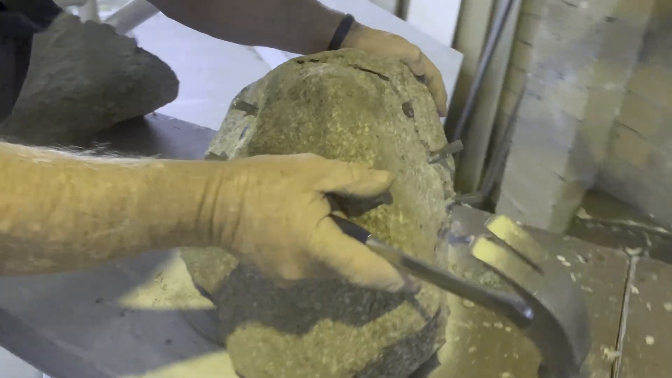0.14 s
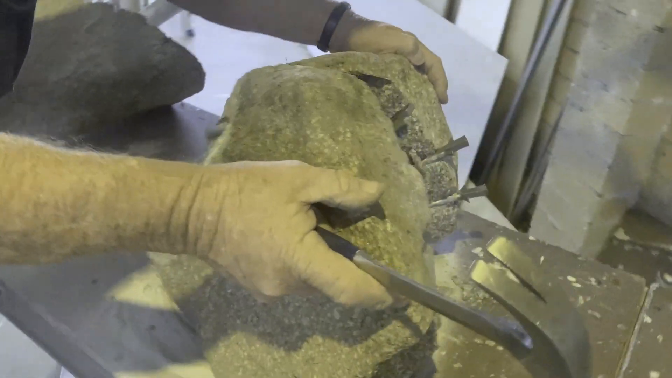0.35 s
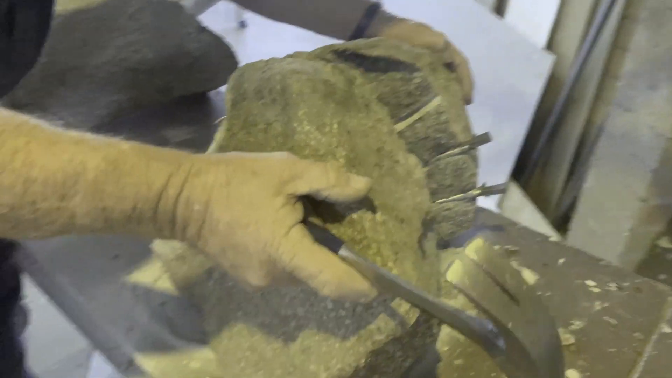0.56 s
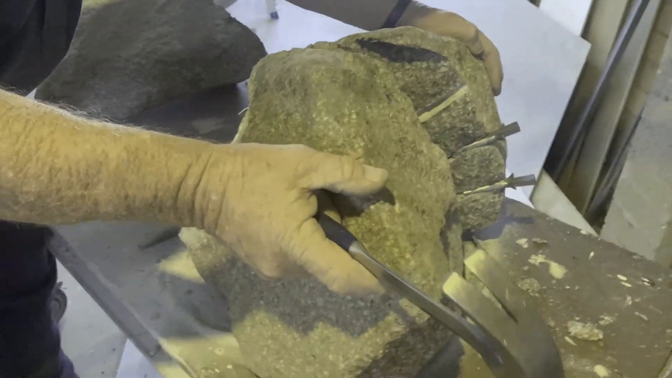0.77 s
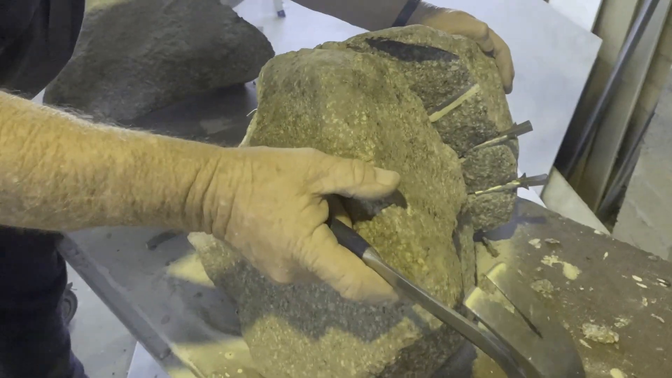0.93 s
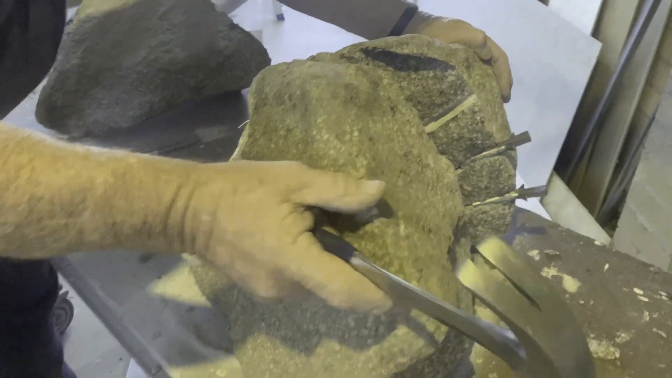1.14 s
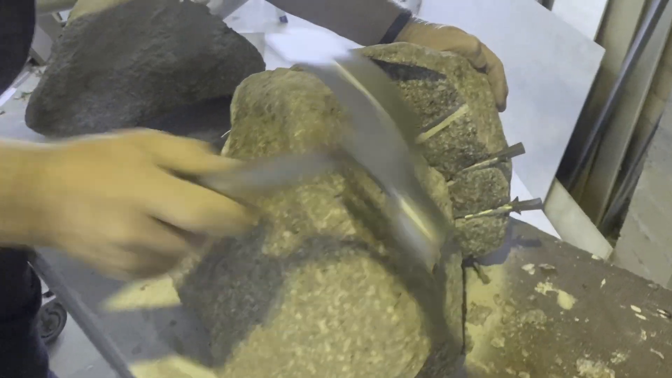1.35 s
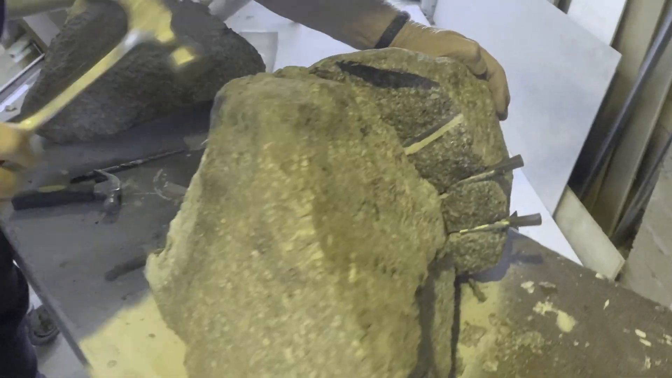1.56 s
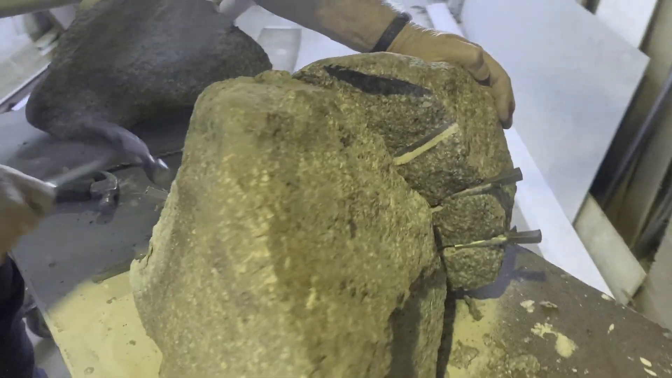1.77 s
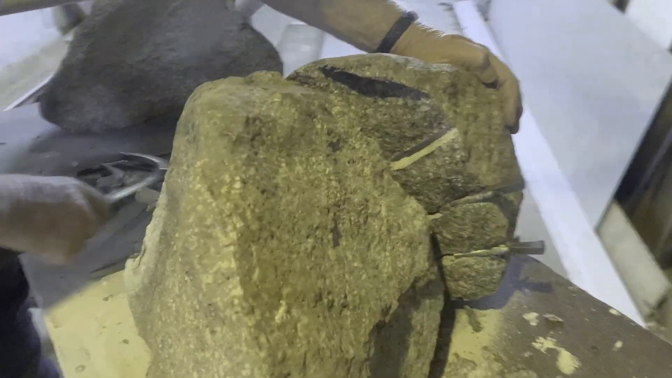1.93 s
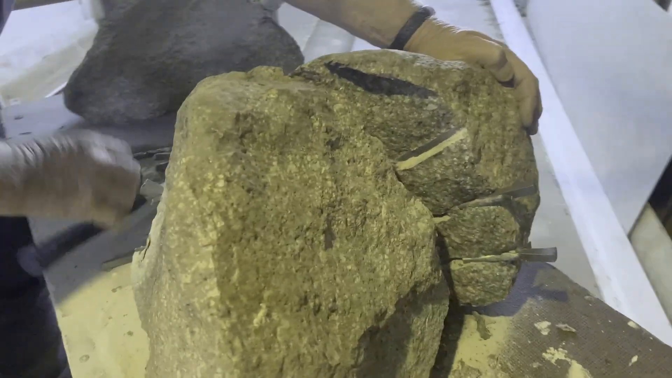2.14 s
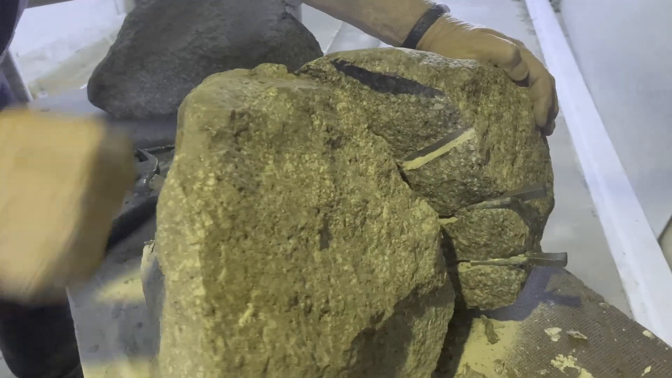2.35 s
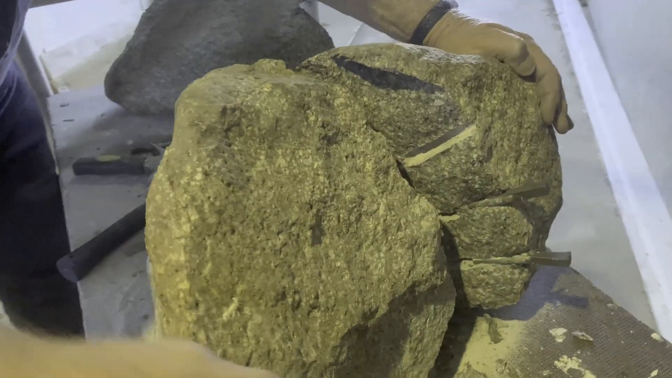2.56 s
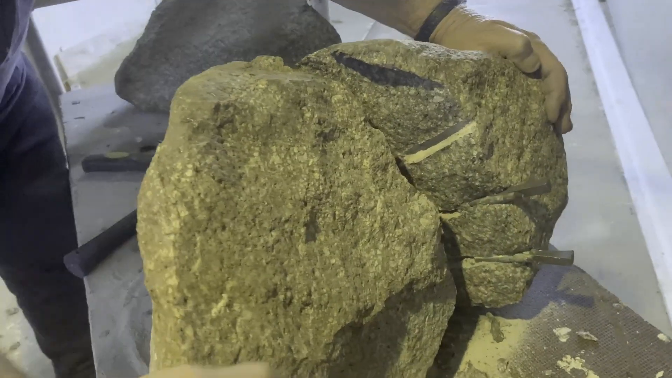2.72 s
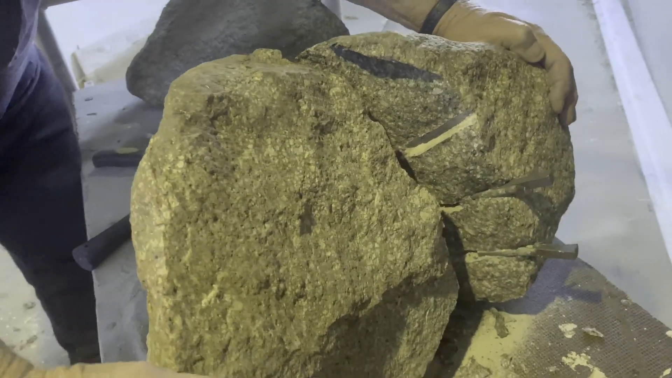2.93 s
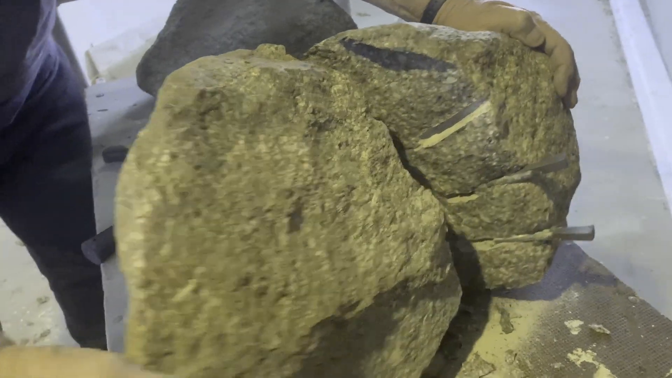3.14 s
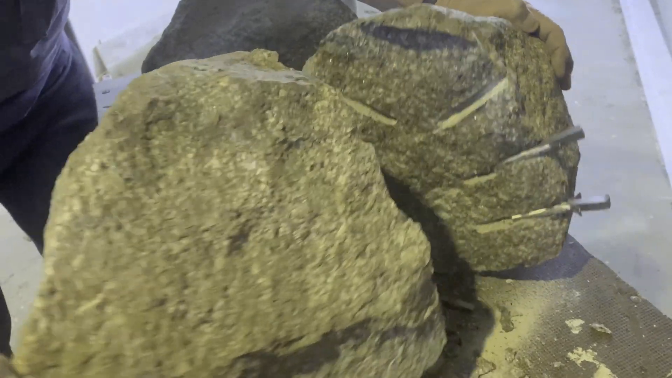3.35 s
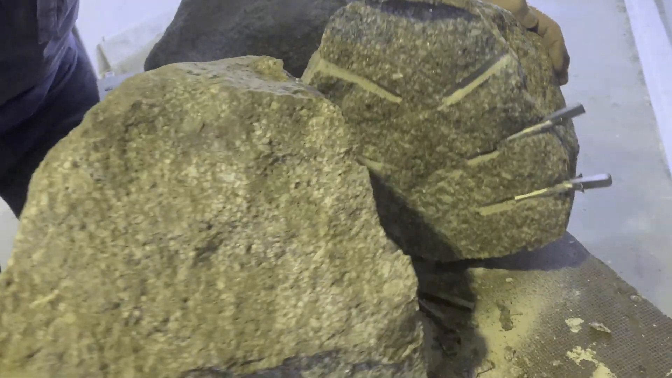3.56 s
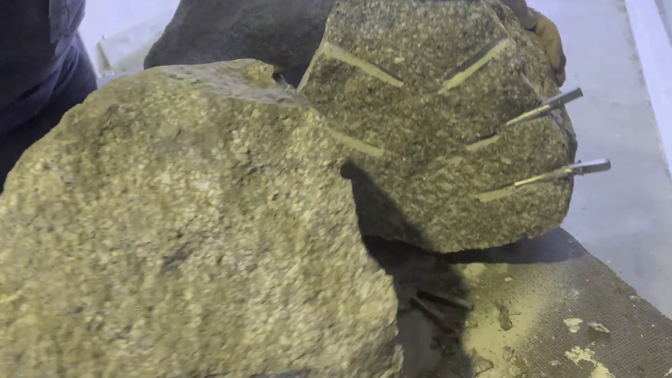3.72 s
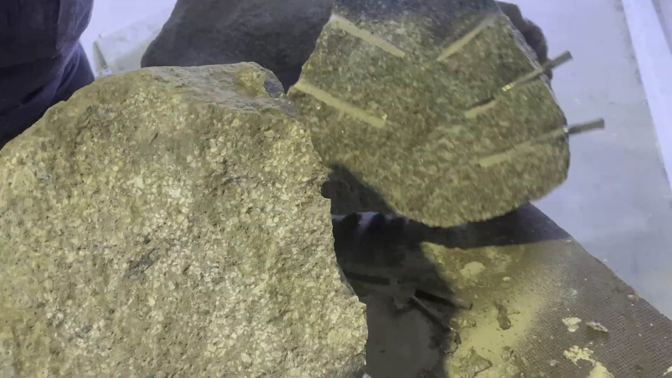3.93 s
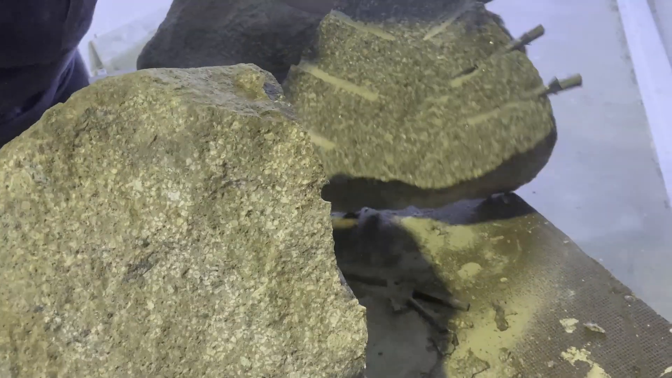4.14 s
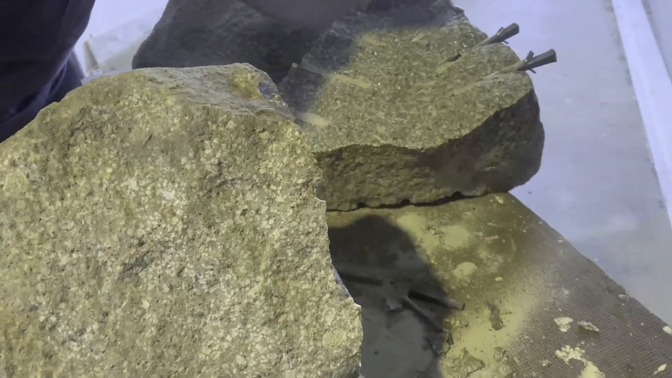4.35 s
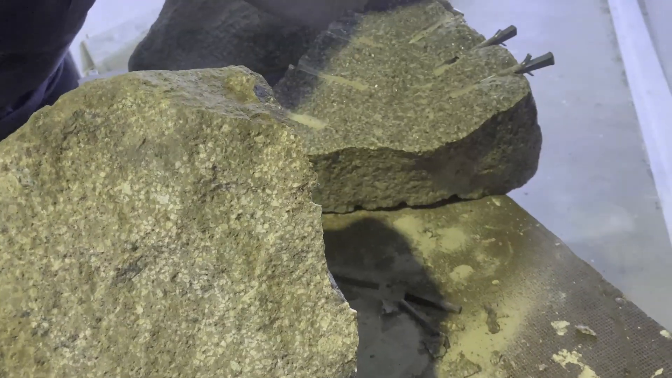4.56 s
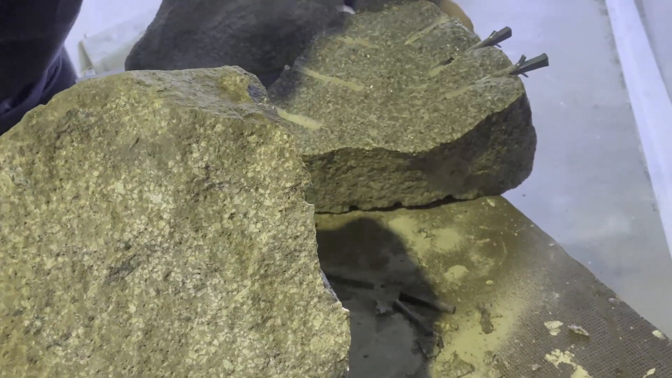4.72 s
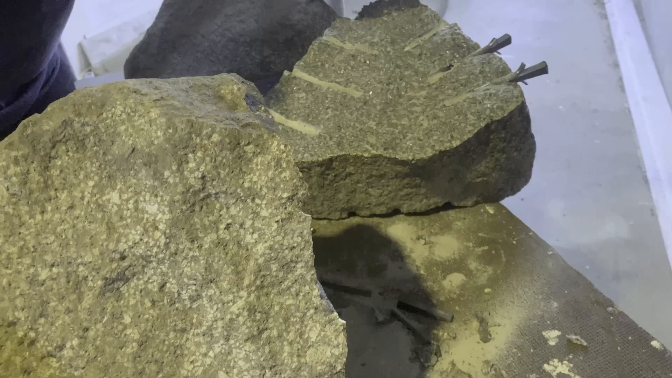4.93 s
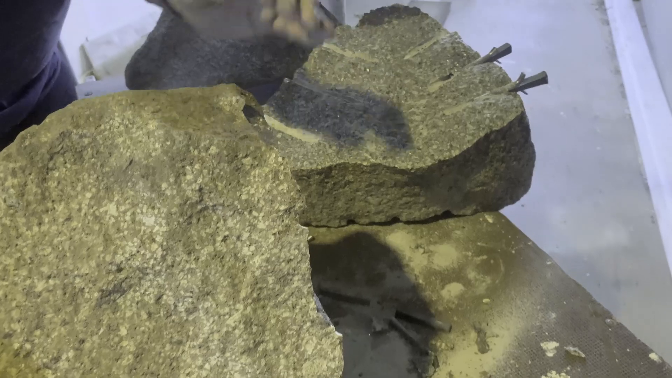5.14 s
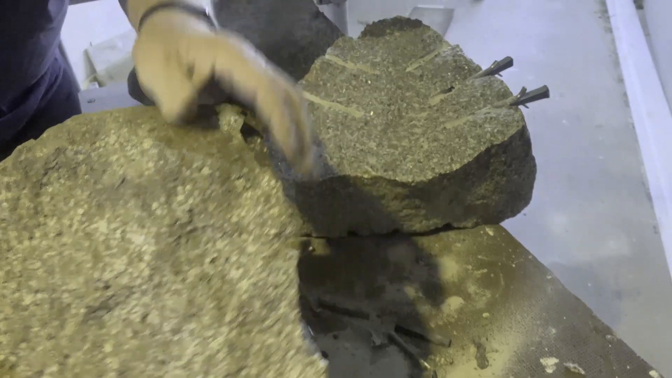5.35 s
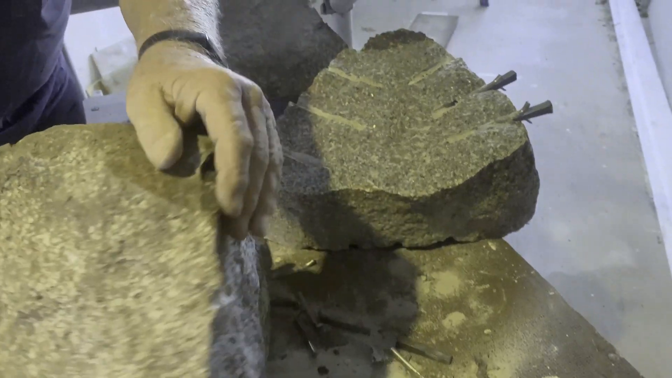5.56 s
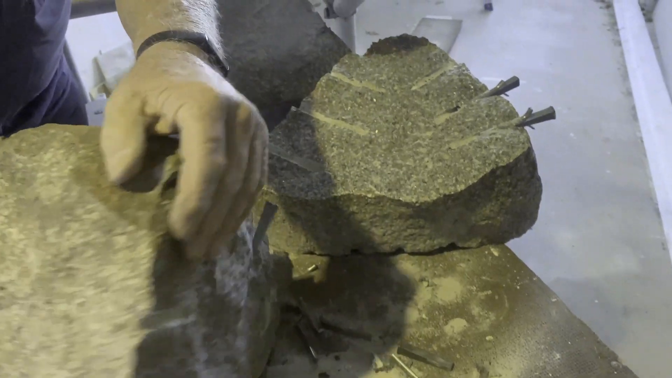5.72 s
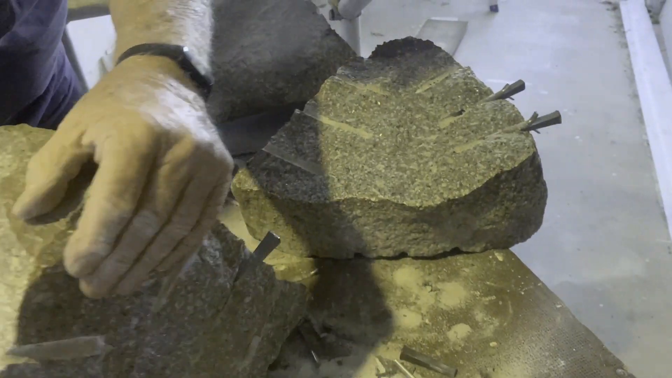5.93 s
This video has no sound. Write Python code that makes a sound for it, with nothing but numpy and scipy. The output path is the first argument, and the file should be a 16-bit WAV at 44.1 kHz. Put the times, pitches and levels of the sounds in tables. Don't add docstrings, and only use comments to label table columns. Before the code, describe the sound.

Close, gritty stone scraping and hard hollow knocks come in bursts, with snapping grains and low bench thuds in a small dull workshop.

```python
import sys
import numpy as np
from scipy import signal
from scipy.fft import rfft, irfft, next_fast_len
from scipy.io import wavfile
from scipy.ndimage import uniform_filter1d

SR = 44100
rng = np.random.default_rng(int(sys.argv[2]) if len(sys.argv) > 2 else 0)


def persist_wave(psi):
    counts = np.round(np.clip(psi, -1, 1) * 32767).astype(np.int16)
    wavfile.write(sys.argv[1], SR, np.atleast_2d(counts).T)


def linear_from_db(decibels):
    return 10 ** (np.asarray(decibels, float) / 20)


N = 268569
T = np.arange(N) / SR


def band(x, lo_hz, hi_hz, order=2):
    return signal.sosfilt(signal.butter(order, [lo_hz, min(hi_hz, .45 * SR)], "band", fs=SR, output="sos"), x)


def unit(x):
    return x / np.sqrt(np.mean(x ** 2))


def ring(x, hz, width_hz):
    return signal.lfilter(*signal.iirpeak(hz, hz / width_hz, SR), x)


def add(out, s, x):
    i = int(s * SR)
    out[:, i:i + x.shape[1]] += x[:, :N - i]


def slips(rate_hz, scatter_db, slip_s, bed):
    caught = rng.random(N) < rate_hz / SR
    kicks = caught * linear_from_db(scatter_db * np.minimum(rng.exponential(size=N), 2))
    force = signal.lfilter([1], [1, -np.exp(-1 / (slip_s * SR))], kicks)
    return (bed + unit(force)) * rng.standard_normal((2, N))


def burst(t, t60_s, sharp_s, swell):
    t60_s = np.clip(t60_s, .015, .5)
    return linear_from_db(-60 * t / t60_s) * (1 - np.exp(-t / (sharp_s + swell * t60_s ** 2)))


def tones(notes):
    out, quarter = np.zeros((2, N)), np.array([[0], [np.pi / 2]])
    for s, db, hz, t60_s, rise_s in notes:
        t = T[:int(max(t60_s, .01) * SR)]
        envelope = linear_from_db(db - 60 * t / t60_s) * (1 - np.exp(-t / rise_s))
        add(out, s, envelope * np.sin(2 * np.pi * hz * t + quarter))
    return out


def drag():
    # t/s, weight on the contact/dB, slide speed as grit over grind/dB
    prise = [(0.0, -77, -5), (0.184, -63, 13), (0.38, -43.5, 2), (0.522, -40.5, -15), (0.952, -52, -18),
             (1.044, -58, -16), (1.3, -74.5, 3), (1.66, -85, -2), (1.955, -89.5, 0.5)]
    lay = [(1.965, -45.5, -19), (2.167, -55, -10.5), (2.337, -44, -31.5), (2.643, -72.5, -2.5),
           (2.9, -85, 15)]
    pull = [(2.91, -77, 9), (3.034, -60.5, -4.5), (3.16, -48.5, 5), (3.246, -48.5, 5), (3.755, -57.5, -10)]
    tip = [(3.765, -47, -2), (3.999, -46.5, -14), (4.205, -53, -11.5), (4.36, -63, -8)]
    settle = [(4.368, -46, -12.5), (4.548, -47, -27), (4.728, -64.5, -14), (5.056, -72, -11),
              (5.235, -77.5, -10)]
    turn = [(5.243, -75, 14.5), (5.333, -53, -1), (5.487, -51.5, 3), (5.749, -48.5, 0.5),
            (6.09, -55.5, -22.5)]
    moves = [(prise, 2.3), (lay, -4), (pull, 3.6), (tip, -1.6), (settle, 1.9), (turn, 5.2)]
    s, weight_db, speed_db, bare_db = np.array([(*row, db) for move, db in moves for row in move]).T
    grind_db, speed_db, bare_db = (np.interp(T, s, c) for c in (weight_db, speed_db, bare_db))
    scrape_db = grind_db + bare_db + 0.36 * speed_db
    grit_db = grind_db + speed_db
    grind = band(slips(96, 1.6, 0.0066, 0.42), 210, 590)
    scrape = band(slips(190, 1.5, 0.0046, 0.45), 640, 2400, order=1)
    scrape = band(scrape, 230, 3500, order=1)
    grit = band(slips(280, 2.0, 0.001, 1.0), 3500, 19000, order=1)
    return linear_from_db(grind_db - 0.5) * unit(grind) + linear_from_db(scrape_db) * unit(scrape) + linear_from_db(grit_db - 1.5) * unit(grit)


def rasp():
    # t/s, level/dB
    grating = [(3.2, -110), (3.33, -60.5), (3.55, -55.5), (3.7, -58.5), (3.75, -89), (3.8, -52.5),
               (3.9, -73), (4.2, -110), (4.53, -77), (4.59, -58.5), (4.67, -74.5), (4.95, -110),
               (5.25, -88), (5.42, -55), (5.65, -53.5), (5.8, -54.5), (5.95, -47), (6.03, -71.5)]
    shear = band(slips(600, 2.0, 0.002, 0.8), 900, 4600, order=1)
    return linear_from_db(np.interp(T, *np.transpose(grating))) * unit(shear)


def knocks():
    # t/s, peak/dB, t60/s, crunch/dB
    board = [(1.988, -31, 0.33, 6.5), (2.109, -32, 0.049, 3), (2.358, -34.5, 0.33, 7.5),
             (2.433, -40, 0.3, 3), (3.305, -34, .1, -5), (3.509, -41, .1, 9), (3.769, -29.5, 0.13, -5.2),
             (3.92, -25, .08, -1), (4.39, -27.5, .4, -1)]
    foot = [(.522, -25, 0.071, -12), (1.973, -33, 0.13, 10.5), (2.05, -29, 0.38, 1), (2.07, -25, 0.1, -0.2),
            (2.384, -33, 0.093, 3), (2.472, -40.5, 0.071, 4.5), (4.379, -27, 0.025, 3.5),
            (4.434, -24.5, .044, -0.5)]
    block = [(.352, -19.5, 0.2, -19.5), (.49, -29.5, 0.07, 4.5), (.544, -25.5, 0.53, -3.5),
             (.557, -21, .07, 5), (.626, -23, 0.18, 2), (.655, -22.5, 0.083, 5), (.69, -35, 0.54, 5),
             (.944, -30.5, 0.059, 5.5), (.975, -38, 0.34, 0), (2.017, -21, .18, -1.5),
             (2.232, -28, 0.12, 8), (2.252, -28.5, 0.2, 3.5), (2.357, -33, 0.085, -0.5),
             (3.13, -31, .1, -10), (3.921, -28, 0.068, 10.5)]
    lip = [(2.417, -36.5, 0.26, -24), (3.939, -26, 0.078, 8.5), (5.243, -57.5, .14, 9.5),
           (5.33, -28, 0.35, 8.5), (5.36, -31.5, 0.099, 15.5), (5.473, -43, 0.4, 3),
           (5.701, -35, 0.019, 10)]
    face = [(.372, -29, 0.052, 11.5), (.445, -24, 0.047, 9), (2.918, -56, 0.023, 5),
            (2.979, -43.5, 0.16, -4.5), (3.041, -33, 0.034, -20), (3.069, -37, 0.028, -3),
            (3.104, -27, 0.1, 4), (3.165, -24.5, .05, 2), (3.222, -20.5, 0.033, -2),
            (3.29, -29, 0.043, 8.5), (3.638, -38, 0.028, 8.5), (3.885, -36.5, 0.36, 12),
            (3.905, -23.5, .08, 4), (4.038, -32, 0.026, -2), (3.842, -37, 0.19, 10),
            (4.366, -23.5, 0.084, -25), (5.844, -27, 0.2, 7), (5.867, -26.5, 0.061, 0.5),
            (5.913, -38, 0.29, 6)]
    edge = [(.424, -31.5, .1, 14), (1.235, -43, 0.049, 1), (3.117, -24, 0.09, 3.5),
            (3.187, -28.5, 0.033, 15), (3.202, -21.5, 0.14, 0.5), (3.248, -32.5, 0.079, 11.5),
            (3.439, -41, .03, 2), (3.467, -46, 0.71, 0), (4.112, -34.5, 0.028, 3), (4.16, -34.5, 0.05, 3),
            (4.57, -44, 0.49, 1), (4.855, -53.5, 0.18, 4.5), (4.173, -41, 0.36, -1)]
    chip = [(.049, -55, 0.087, 5.5), (.34, -28, 0.24, 12), (1.149, -50.5, 0.12, 5),
            (4.732, -51, 0.059, 7.5), (5.817, -22, 0.043, 0.5)]
    # t/s, peak/dB
    taps = [(1.394, -51.5), (1.57, -54.5), (1.625, -56), (1.729, -55.5), (1.759, -56), (2.684, -50),
            (2.868, -56.5), (5.086, -56), (5.113, -49)]
    tap_t60_s, tap_crunch_db = 0.027, -11.5
    tap_rows = [(s, db, tap_t60_s, tap_crunch_db) for s, db in taps]
    # part, ring f/Hz
    parts = [(board, 248), (foot, 410), (block, 552.5), (lip, 815),
             (face, 1010), (edge, 1460), (chip, 1800), (tap_rows, 580)]
    out, t = np.zeros((2, N)), T[:6000]
    for part_hz, s, db, t60_s, crunch_db in [(hz, *row) for rows, hz in parts for row in rows]:
        hz = part_hz * (1 + 0.033 * rng.standard_normal())
        crumble = rng.standard_normal((2, len(t))) * burst(t, t60_s, sharp_s=0.00055, swell=0.072)
        crumble += 0.62 * np.sin(np.pi * np.minimum(2 * hz * t, 1))
        tone = ring(ring(crumble, hz, 0.17 * hz), hz, 3.0 * hz)
        crunch = band(crumble, 0.43 * hz, 700 + 2.0 * hz, order=1)
        crunch = band(crunch, 230, 1500 + 1.29 * hz)
        add(out, s, linear_from_db(db - 5.0) * (tone / abs(tone).max() + linear_from_db(crunch_db) * crunch / abs(crunch).max()))
    return out


def cracks():
    # t/s, peak/dB
    snaps = [(.331, -28), (.507, -40), (.593, -51), (.038, -54), (.05, -49), (.097, -48), (.337, -17),
             (.442, -21), (.556, -32), (.943, -46), (1.232, -49), (1.294, -51), (1.971, -60), (2.017, -44),
             (2.117, -44), (2.178, -61), (2.599, -51), (2.915, -48), (3.038, -39.5), (3.252, -22.5),
             (3.288, -24.5), (3.377, -33), (4.112, -35.5), (4.162, -39), (4.242, -47), (4.734, -45),
             (4.86, -60), (4.942, -57), (5.251, -53.5), (5.283, -45), (5.702, -30), (5.74, -50),
             (5.818, -22.5)]
    sprays = [(.353, -21), (.42, -23.5), (.527, -46.5), (2.229, -46), (3.088, -46), (3.105, -21),
              (3.119, -22), (3.167, -22.5), (3.193, -21.5), (3.206, -19.5), (3.573, -36), (3.905, -27),
              (3.924, -21), (3.94, -27), (4.393, -46), (4.42, -45), (5.863, -25), (5.914, -25.5)]
    pours = [(.371, -34), (.624, -42.5), (.816, -44), (1.153, -56.5), (1.488, -63), (2.351, -60),
             (2.68, -63), (2.981, -48), (3.629, -39), (3.842, -31), (3.886, -27.5), (4.586, -63),
             (5.318, -34.5), (5.329, -30), (5.359, -23), (5.809, -29), (5.842, -24.5)]
    kinds = [(snaps, 0.028), (sprays, 0.1), (pours, 0.2)]
    out, t = np.zeros((2, N)), T[:5000]
    for t60_s, s, db in [(t60_s, *row) for rows, t60_s in kinds for row in rows]:
        tick = 0.53 * np.exp(-t / 0.0015)
        dust = rng.standard_normal((2, len(t))) * (burst(t, t60_s, sharp_s=0.00037, swell=0.15) + tick)
        dust = band(dust, 2700, 17000, order=1)
        add(out, s, linear_from_db(db + 1.0) * dust / abs(dust).max())
    return out


def bodies(x):
    # [(f/Hz, width/Hz, lift/dB)]
    moved = [
        (0, [(509, 160, -1), (984, 460, 4), (1500, 400, 3)]),
        (1.941, [(245, 60, 14), (411, 96, 6), (525, 110, 5.5), (1050, 500, 4)]),
        (2.899, [(240.5, 61, 10.5), (497, 21, 7.5), (1030, 61, 8), (1500, 80, 7), (2840, 43, 5), (3140, 190, 6.5)]),
        (3.7, [(278, 46, -0.5), (480, 92, -2), (960, 300, 6), (3000, 900, 3), (1460, 110, 4.5)]),
        (4.34, [(261, 55, 5), (780, 90, -1), (1500, 120, 6), (2050, 150, 8), (3700, 120, 6), (4500, 150, 6), (6000, 400, 7)]),
        (5.221, [(251, 29, 8), (696, 28, -30.5), (825, 70, 2), (1000, 36, 0.5), (1620, 64, 3), (2090, 110, 2.5), (3230, 490, 3.5)]),
    ]
    out = x.copy()
    ends = [s for s, _ in moved[1:]] + [N / SR]
    for (s, modes), end in zip(moved, ends):
        part = np.pad(x[:, int(s * SR):int(end * SR)], ((0, 0), (0, SR // 10)))
        add(out, s, sum((linear_from_db(db) - 1) * ring(part, hz, width_hz) for hz, width_hz, db in modes))
    return out * linear_from_db(-5.5)


def thicket(x, t60_s=0.065, dense_db=-7, size=6000):
    out, t = x.copy(), T[:5000]
    for i in range(0, N - size, size // 2):
        modes = band(rng.standard_normal((1, len(t))), 320, 6600, order=1) * linear_from_db(-60 * t / t60_s)
        modes *= linear_from_db(dense_db) / np.sqrt(np.sum(modes ** 2))
        add(out, i / SR, signal.fftconvolve(x[:, i:i + size] * np.hanning(size), modes, axes=1))
    return out


def rings():
    # t/s, peak/dB, f/Hz
    contacts = [(0.378, -33, 1740), (0.382, -29.5, 536), (0.41, -28.5, 470), (0.447, -25, 523),
                (0.487, -32, 367), (0.557, -20, 528), (0.656, -29, 1280), (0.676, -34, 1130),
                (0.689, -30, 425), (0.943, -33.5, 1196), (0.958, -39, 565), (0.977, -39, 585),
                (2.039, -24.5, 430), (2.232, -24.5, 295), (2.254, -23, 497), (2.308, -36, 830),
                (2.389, -28.5, 342), (2.414, -33, 382), (2.43, -32, 283), (2.466, -32, 256),
                (2.495, -36, 220), (3.106, -27, 1490), (3.118, -28.5, 526), (3.123, -25, 1990),
                (3.142, -28, 510), (3.165, -30.5, 586), (3.184, -28, 1505), (3.2, -30, 1010),
                (3.204, -32, 1510), (3.222, -26, 990), (3.245, -29, 1420), (3.287, -31, 990),
                (3.295, -28, 278), (3.309, -28.5, 976), (3.436, -37, 1000), (3.635, -37, 1090),
                (3.848, -36.5, 258), (3.858, -39, 390), (3.889, -32, 1270), (3.905, -32.5, 262),
                (3.91, -27.5, 765), (3.923, -25, 965), (3.931, -26, 890), (4.035, -39, 614),
                (4.382, -32.5, 463), (4.415, -34.5, 690), (5.337, -30, 802), (5.386, -33.5, 830),
                (5.478, -41, 860), (5.507, -40, 1130), (5.815, -34.5, 3100), (5.818, -37, 2400),
                (5.82, -39, 1060), (5.846, -33, 2100), (5.854, -29.5, 1130), (5.867, -31.5, 955),
                (5.869, -31, 1670), (5.924, -39, 272), (5.927, -39, 1180), (5.95, -39, 278),
                (.47, -31, 430), (.525, -31, 503), (.556, -35.5, 2900), (.583, -29, 500), (.627, -36, 1400),
              (.668, -33, 481), (.66, -38, 1904), (1.975, -30, 231), (2.02, -27, 229), (2.07, -30.5, 1100),
              (2.11, -30, 330), (2.36, -36, 1156), (2.365, -42, 1690), (3.017, -44.5, 984),
              (3.039, -37, 1037), (3.065, -38.5, 1030), (3.165, -27.5, 1030), (3.166, -31, 1500),
              (3.11, -28, 1030), (3.77, -39.5, 400), (4.4, -32.5, 230), (4.42, -34, 400), (4.46, -35, 300),
              (4.5, -38, 251), (4.86, -58, 1900), (4.98, -62, 2000), (3.438, -35, 1000), (4.165, -42, 1900),
              (.943, -36, 1900), (5.284, -44, 830), (5.7, -37, 1700), (5.846, -31.5, 1100)]
    floor_t60_s, cycles = .026, 14
    return tones([(s, db - 1.0, hz, floor_t60_s + cycles / hz, 0.0012) for s, db, hz in contacts])


def shims():
    steel_hz = [2230, 4120, 6900, 7500, 8102, 8473, 9150, 10121, 10325, 10826, 11380, 11617, 12053, 12188,
                12409, 12645, 15195]
    # t/s, level/dB
    strikes = [
        [(.352, -38), (.37, -37)],
        [(0.335, -38.5), (.42, -46.5)],
        [(.338, -48)],
        [(3.947, -50)],
        [(.44, -48.5), (.52, -45.5), (.71, -55), (.83, -56)],
        [(4.165, -48)],
        [(.52, -48), (.86, -57), (4.59, -74)],
        [(.617, -44), (.8, -55), (.84, -59.5), (.985, -65.5), (4.47, -75.5), (4.6, -69)],
        [(1.068, -70), (1.334, -66), (3.94, -41.5), (4.78, -76)],
        [(.405, -49), (.5, -47.5), (.55, -50), (.66, -51.5)],
        [(.55, -58)],
        [(.47, -49), (.812, -62)],
        [(3.95, -49)],
        [(.40, -46), (.66, -48.5), (.87, -57)],
        [(0.441, -41)],
        [(4.165, -61)],
        [(.522, -43.5), (.64, -47), (.72, -52.5), (.84, -61), (3.93, -58), (4.05, -65)],
    ]
    t60_s = 0.36
    out, t = np.zeros((2, N)), T[:20000]
    for hz, s, db in [(hz, *row) for hz, rows in zip(steel_hz, strikes) for row in rows]:
        rate, start, *phase = rng.random(4)
        beat = 1 + 0.45 * np.cos(2 * np.pi * ((8 + 14 * rate) * t + start))
        beat *= 1 - np.exp(-t / 0.0032)
        beat *= linear_from_db(4.3 * unit(uniform_filter1d(rng.standard_normal(len(t)), size=350)))
        tone = np.sin(2 * np.pi * (hz * t + np.c_[phase]))
        add(out, s, linear_from_db(db - 0.5 - 60 * t / t60_s) * beat * tone)
    return out


def bench():
    # t/s, panel hum/dB, leg rumble over hum/dB, build-up from -60 dB/s
    shifts = [(.34, -47, -5, 0.1), (.57, -53.5, -13, 1), (.9, -63.5, -13, 2.5), (1.2, -69, -8.5, 4.5),
              (2.029, -35.5, -9.5, 0.15), (2.34, -38.5, -15, 0.68), (2.529, -53.5, -6.5, 0.5),
              (3.24, -54, -5.5, 0.5), (3.5, -53, -3.5, 1.24), (3.75, -43.5, -15, 1.36),
              (3.98, -49.5, -10.5, 1.9), (4.391, -35, -11, 0.02), (4.49, -45.5, -18, 0.73),
              (4.8, -64.5, -5.5, 0.1), (5.36, -47, -18, 0.22), (5.52, -40, -30, 0.39),
              (5.66, -41.5, -20, 0.72), (5.82, -44.5, -10.5, .5)]
    fade_db_per_s, rest_db = 73, -90
    push_db = [db - np.maximum(60 * (s - T) / rise_s, fade_db_per_s * (T - s)) for s, db, _, rise_s in shifts]
    leg_db = [push + row[2] for push, row in zip(push_db, shifts)]
    hum_gain = linear_from_db(rest_db) + linear_from_db(np.max(push_db, axis=0))
    rumble_gain = linear_from_db(rest_db + 7.0) + linear_from_db(np.max(leg_db, axis=0))
    hum = ring(ring(rng.standard_normal((2, N)), 133, 9), 133, 18)
    hum /= (uniform_filter1d(unit(hum) ** 2, size=1500) + 0.021) ** 0.73
    rumble = band(slips(27, 1.5, 0.0061, 0.95), 50, 140)
    return hum_gain * linear_from_db(2.5) * unit(hum) + rumble_gain * linear_from_db(-1.5) * unit(rumble)


def sways():
    # t/s, peak/dB, f/Hz, t60/s
    loads = [
        (0.199, -57.5, 80.4, .5),
        (2.42, -48, 69.7, 0.7),
        (4.55, -52.5, 49, 0.66),
        (5.8, -51.5, 85, .5),
    ]
    return tones([(*row, .06) for row in loads])


def walls(x, t60_s=0.42, wet_db=-15):
    t = T[:24000]
    tail = band(rng.standard_normal((2, len(t))), 110, 3700, order=1)
    tail *= linear_from_db(-60 * t / t60_s) * (t > .008)
    return linear_from_db(wet_db) * signal.fftconvolve(x, tail / np.sqrt(np.sum(tail[0] ** 2)), axes=1)[:, :N]


def shed():
    # f/Hz, density/dB per Hz
    spectrum = [(18, -30), (30, -25.5), (65, -1), (364, 0), (524, -14.5), (1000, -17), (3680, -21),
                (15000, -41)]
    hz, db = np.transpose(spectrum)
    size = next_fast_len(N)
    colour = linear_from_db(np.interp(np.log(np.fft.rfftfreq(size, 1 / SR) + 1), np.log(hz), db))
    air = irfft(rfft(rng.standard_normal((2, size))) * colour, size)[:, :N]
    return linear_from_db(-80) * unit(air)


def ports(x):
    # f/Hz, phase lead of the right/rad, likeness/0-1
    pair = [(0, -.4, .5), (65, -1.1, .85), (125, -2.2, .99), (190, -2.8, .9), (240, -5.2, .7),
            (300, -6.0, .8), (380, -6.2, .85), (470, -6.7, .8), (720, -7.0, .6), (1100, -6.8, .62),
            (1400, -7.9, .5), (1800, -9.1, .3), (2300, -11.3, .25), (2900, -12.4, .2), (3600, -12.8, .1),
            (4500, -13.3, .3), (5500, -10.1, .3), (6500, -6.0, .65), (7400, -4.5, .45), (8000, -3.8, .8),
            (8500, -3.15, .95), (9000, -2.8, .8), (9800, -1.5, .68), (11000, 0, .9), (12200, 1.6, .85),
            (13000, 2.8, .8), (13500, 3.15, .96), (14000, 3.7, .76), (15000, 5.2, .75), (16000, 6.6, .75)]
    size = next_fast_len(N + 4096)
    hz, lead, alike = np.transpose(pair)
    lead, alike = (np.interp(np.fft.rfftfreq(size, 1 / SR), hz, c) for c in (lead, alike))
    shared, own = rfft(x, size)
    right = (alike * shared + np.sqrt(1 - alike ** 2) * own) * np.exp(1j * lead)
    return np.array([x[0] * linear_from_db(5.8), irfft(right, size)[:N] * linear_from_db(6.0)])


def scene():
    stone = thicket(bodies(drag() + knocks() + cracks())) + rings() + sways() + rasp()
    return ports(stone + walls(stone) + shims() + bench() + shed())


def band_limit(x):
    return signal.sosfilt(signal.butter(12, 16960, fs=SR, output="sos"), x)


def record(dry):
    soft = .33 * np.tanh(dry / .33)
    cut = signal.sosfilt(signal.ellip(8, .2, 35, 15680, fs=SR, output="sos"), soft)
    return band_limit(cut)


dry = scene()
out = record(dry)
persist_wave(out)
```